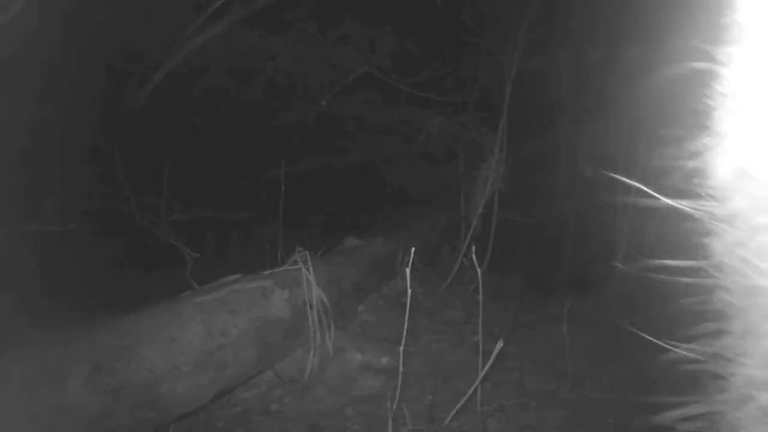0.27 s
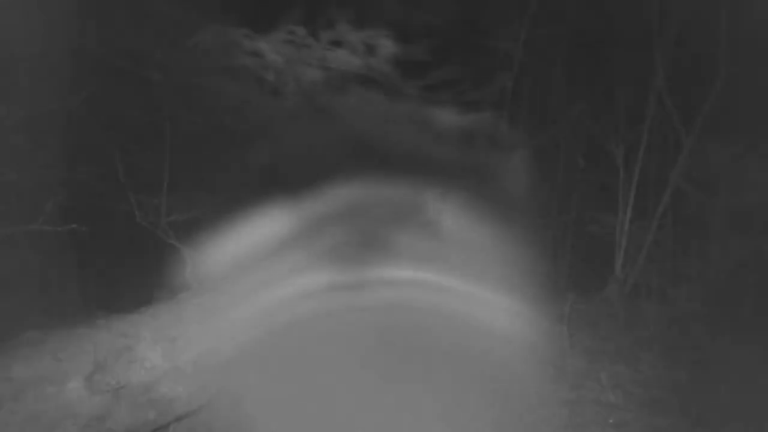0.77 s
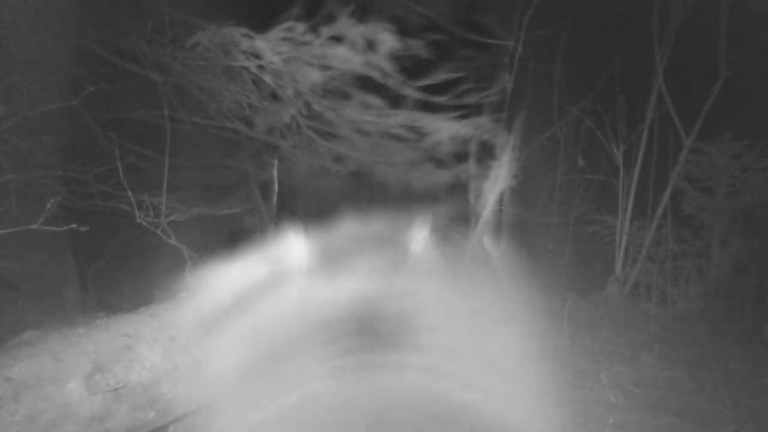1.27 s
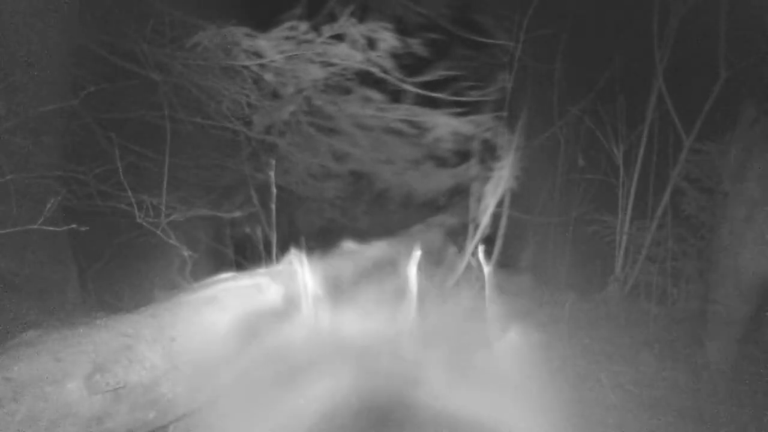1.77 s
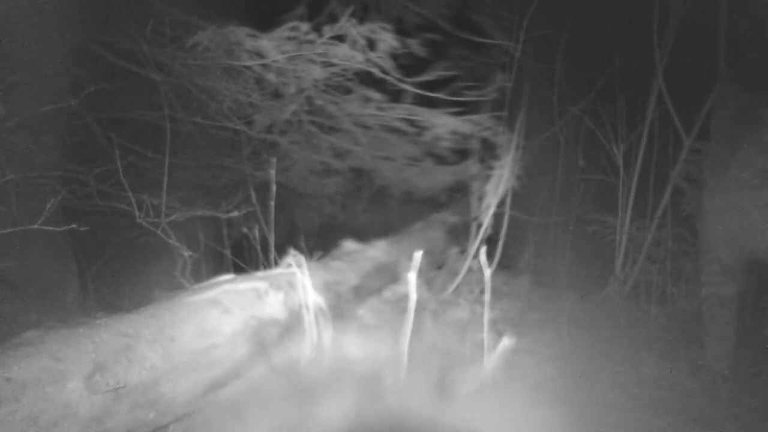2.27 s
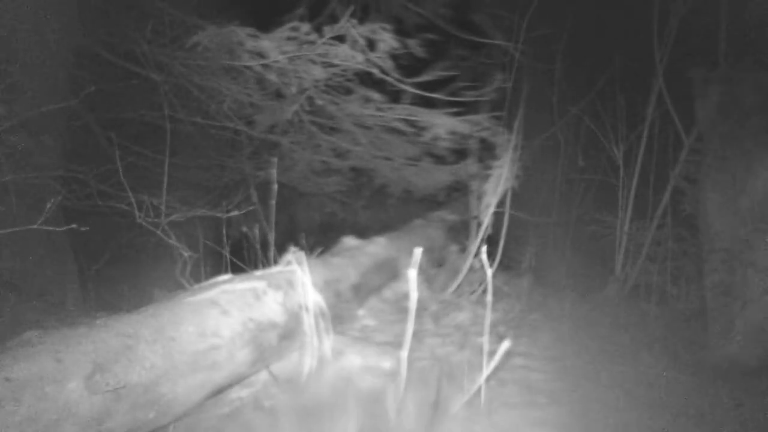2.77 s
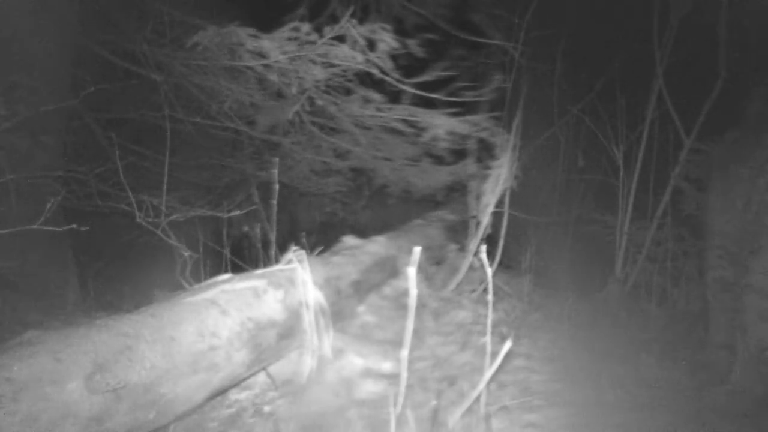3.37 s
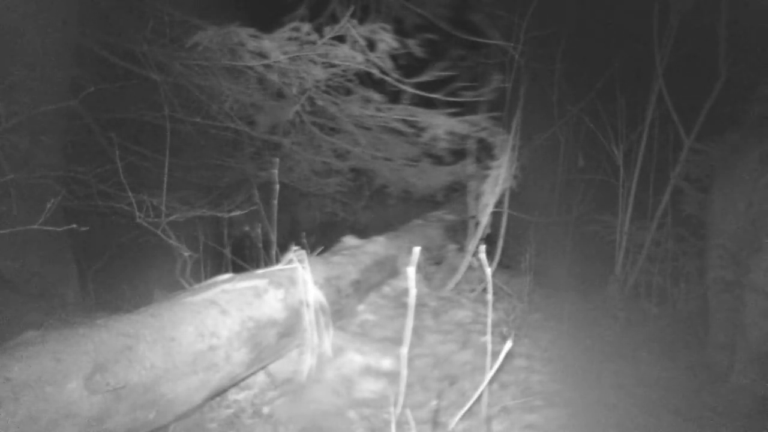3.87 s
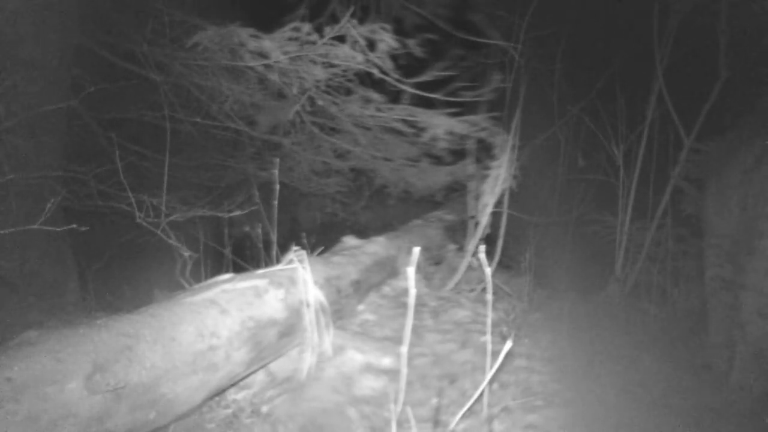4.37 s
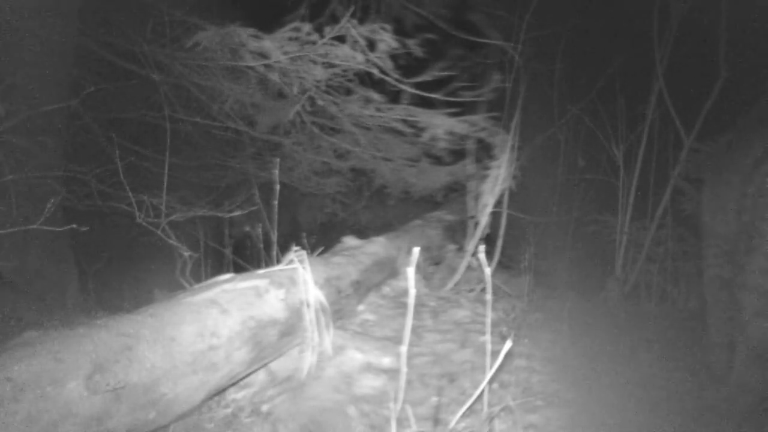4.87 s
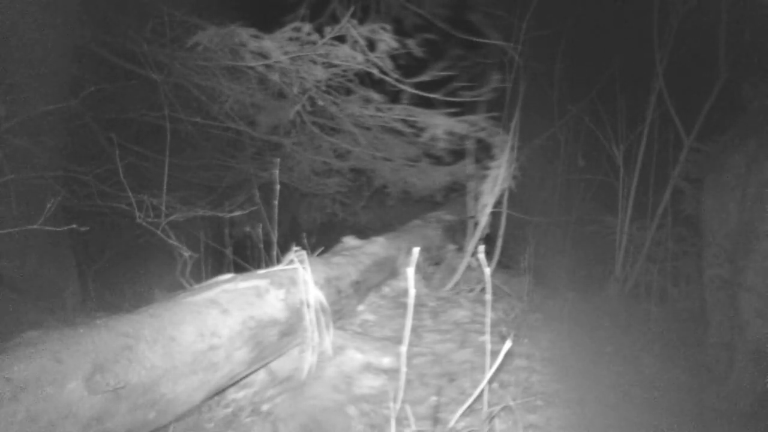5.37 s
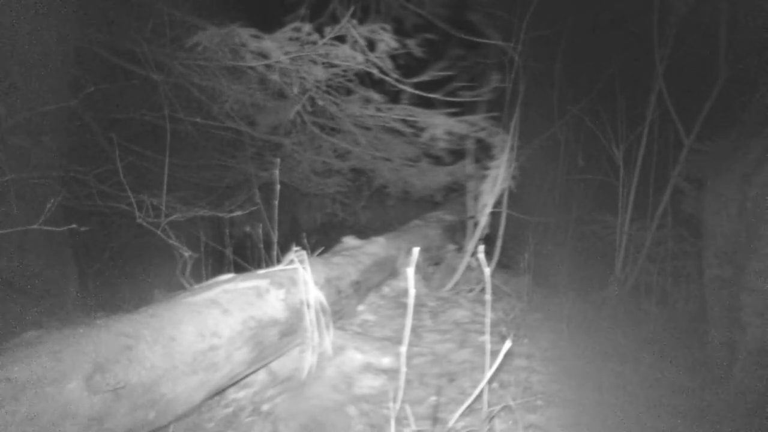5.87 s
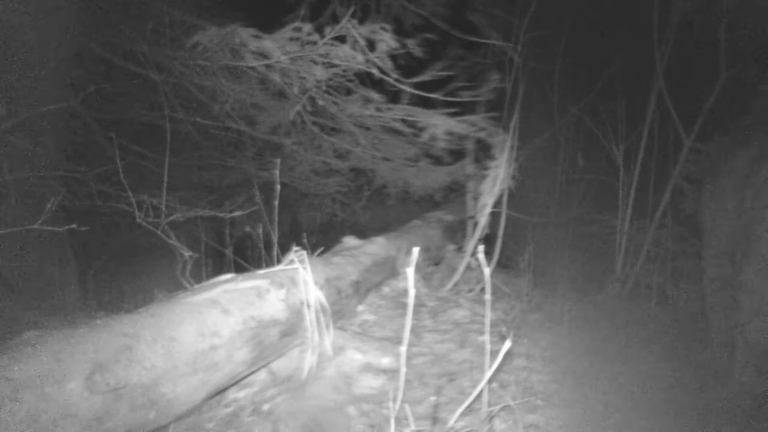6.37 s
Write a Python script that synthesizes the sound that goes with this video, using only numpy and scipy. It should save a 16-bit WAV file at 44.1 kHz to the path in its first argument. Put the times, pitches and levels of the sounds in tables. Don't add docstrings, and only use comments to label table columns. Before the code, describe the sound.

Fur scrapes and crackles against a small outdoor device at night, then a wild cat growls briefly and gives three loud, harsh, falling calls.

```python
import sys
import numpy as np
from scipy import signal
from scipy.fft import rfft, irfft, next_fast_len
from scipy.io import wavfile
from scipy.ndimage import uniform_filter1d

SR = 44100
rng = np.random.default_rng(int(sys.argv[2]) if len(sys.argv) > 2 else 0)


def master_out(mix):
    frames = np.transpose(np.atleast_2d(mix))
    ceiling = np.clip(frames, -1, 1)
    pcm = np.round(ceiling * 32767).astype(np.int16)
    wavfile.write(sys.argv[1], SR, pcm)


def decibels_to_gain(level_db):
    exponent = np.asarray(level_db, float) / 20
    return 10 ** exponent


N = 292362

# frequency in Hz, density in dB per Hz.
HISS = [(13, -32), (22, -6.5), (32, -14), (325, -17), (375, -18.5), (906, -19.5), (997, -21.5),
        (1810, -25.5), (4800, -31.5), (6550, -43), (8520, -86), (14400, -120)]
# frequency in Hz, decay time over 60 dB in seconds.
WOOD_T60 = [(300, 0.3), (800, 2), (1080, 1.96), (1300, .8), (1900, 1.4), (2400, 0.93), (4000, 0.7)]
# frequency in Hz, level in dB.
SCATTER = [(300, -13), (700, -9.5), (980, -4.5), (1075, 3), (1180, -3.5), (1400, 4), (1900, 10.5),
           (2400, 16.5)]

# frequency in Hz, width in Hz.
PORT = (4880, 1200)
# frequency in Hz, width in Hz, level in dB.
CASE = [(280, 470, -1.5), (550, 160, 8.5), (1040, 430, 11), (1625, 1500, 3.5), (2690, 1400, 11.5)]
# time in seconds, peak in dB, case level relative to it in dB.
SNAPS = [(0.0683, -30, -10.5), (0.1284, -29, -4), (0.1536, -19.5, -6), (0.4117, -33.5, -4),
         (0.4686, -34, -7.5), (0.5541, -33.5, -9), (0.7133, -39, -14), (0.7645, -27, -4), (0.8207, -35, -5),
         (0.828, -33.5, -0.5), (0.8535, -31, -10), (0.8833, -42, -5), (0.904, -40, -8), (0.9105, -33, 3),
         (1.067, -40, -11), (1.0869, -35.5, -16), (1.1963, -37, -15), (1.2197, -35, -7), (1.4698, -33, -13),
         (1.5187, -36, -8), (1.6404, -35.5, -3), (1.7486, -35, -12), (1.7755, -31, -11),
         (1.8407, -35.5, -1.5), (2.0597, -38, -8), (2.354, -38, -12), (2.385, -38.5, -10),
         (2.6894, -27.5, -18), (2.8399, -40, -13)]
# start in seconds, length in seconds, crackle in dB,
# case level relative to it in dB.
STROKES = [(0, 0.2, -46.5, 2.5), (0.129, 0.057, -43.5, 8), (.345, 0.37, -55.5, -2.5), (.4, 0.027, -55, -1),
           (0.61, 0.039, -53, -3), (0.758, 0.025, -42.5, -2), (0.815, .19, -54.5, -1),
           (0.923, 0.055, -51.5, -2), (1.042, 0.46, -57, -4), (1.219, 0.09, -47.5, -3.5),
           (1.518, 0.077, -45.5, -1.5), (1.597, 0.053, -55.5, -1), (1.739, 0.044, -52, 0),
           (1.824, 0.048, -54.5, -6), (2.049, 0.04, -52, -5), (2.099, 0.035, -53.5, -2.5),
           (2.163, 0.095, -64, 4), (2.353, 0.11, -59, 0), (2.833, 0.15, -57, 0.5), (2.95, 0.12, -55, -1.5),
           (3.064, 0.27, -69, -6), (.2, 2.5, -63, -6), (0.148, .02, -40.5, 6), (1.525, 0.044, -47.5, 3),
           (0.779, 0.0098, -35.5, 1.5), (0, 0.012, -42.5, 2)]
# time in seconds, level in dB.
NUDGES = [
    (.142, -59),
    (.354, -65),
    (0.627, -56),
    (.8, -67),
    (2.4, -54),
]

# frequency in Hz, width in Hz, level in dB.
THROAT_LOW = [(560, 360, 1), (955, 263, 4.5), (1194, 67, -18.5)]
THROAT_MID = [(1620, 110, -1), (1770, 110, -2), (1910, 90, 0), (2140, 110, -7), (2340, 90, -9)]
THROAT_EDGE = [(2600, 110, 13.5), (3140, 300, -3)]
THROAT_TOP = [(4735, 510, -0.5), (5540, 550, -1.5)]
# frequency in Hz, width in Hz, fading time in seconds.
GAPE = (1325, 160, 0.048)
# frequency in Hz, width in Hz, level in dB.
CHEST = (260, 100, -43.5)

# time in seconds, level in dB.
EFFORT = [
    [(2.465, -54.5), (2.477, -37), (2.505, -25), (2.591, -18.5), (2.69, -25), (2.76, -28.5), (2.82, -44.5),
     (2.87, -60)],
    [(3.795, -78), (3.803, -53.5), (3.847, -25), (3.905, -9.5), (3.969, -13), (4.015, -19.5), (4.075, -20),
     (4.19, -56)],
    [(5.03, -65), (5.042, -58), (5.056, -36), (5.102, -14), (5.138, -7.5), (5.234, -12.5), (5.366, -22),
     (5.416, -39.5), (5.45, -58.5)],
    [(6.255, -71), (6.277, -43.5), (6.307, -19), (6.377, -8.5), (6.447, -7.5), (6.487, -12.5),
     (6.609, -19.5), (6.63, -18.5)],
]
# time in seconds, frequency in Hz.
WHISTLE = [
    [(2.465, 4820), (2.68, 4600), (2.76, 3920), (2.87, 3900)],
    [(3.795, 4880), (3.9, 4900), (4.1, 5300), (4.19, 4780)],
    [(5.03, 4840), (5.31, 4985), (5.36, 4390), (5.42, 4470), (5.45, 4240)],
    [(6.255, 4880), (6.5, 4920), (6.59, 4890), (6.63, 4600)],
]
# time in seconds, frequency in Hz.
LOW = [
    [(2.465, 100.2), (2.531, 156.1), (2.599, 171.5), (2.709, 142.4), (2.765, 167.8), (2.813, 135),
     (2.87, 129.6)],
    [(3.795, 202.2), (3.811, 217.6), (3.867, 483), (3.913, 523.1), (4.0, 501.7), (4.031, 474),
     (4.091, 472.5), (4.141, 374.4), (4.19, 380)],
    [(5.03, 346.2), (5.118, 581.2), (5.174, 672.7), (5.22, 693), (5.294, 554), (5.335, 520), (5.378, 489),
     (5.415, 396), (5.45, 384)],
    [(6.255, 384), (6.305, 506), (6.349, 732.3), (6.385, 746), (6.467, 709.2), (6.549, 585.3),
     (6.597, 518.5), (6.63, 532)],
]
# time in seconds, frequency in Hz.
HIGH = [
    [(2.48, 432.8), (2.574, 539), (2.645, 466.2), (2.719, 434), (2.751, 498), (2.8, 417)],
    [(3.82, 424), (3.88, 785.5), (3.914, 886.5), (3.96, 836), (3.995, 727), (4.091, 702), (4.14, 556)],
    [(5.05, 493.8), (5.108, 914), (5.112, 1109), (5.202, 1056), (5.288, 870), (5.342, 774), (5.43, 782)],
    [(6.275, 596.8), (6.33, 941), (6.334, 1121), (6.35, 1156), (6.422, 1120), (6.546, 945), (6.566, 829),
     (6.63, 811)],
]
# start in seconds, end in seconds, roughness before,
# during and after it (0 to 1).
CHAOS = [
    (2.53, 2.66, .3, .5, .38),
    (3.89, 4.025, .3, .55, .12),
    (5.175, 5.295, .18, .75, .2),
    (6.42, 6.555, .2, .6, .27),
]
STAGES = (0, .25, .45, 1)
# one call, share in dB at each of the four stages.
LOW_SHARE_DB = [(-26.5, -15, -23.5, -24), (2, -21.5, -10.5, 2), (-11, -22.5, -7.5, -0.5),
                (-24.5, -16.5, -4.5, -4)]
HIGH_SHARE_DB = [(-2.5, -8.5, -10.5, -6), (-5, -9.5, -7.5, -14.5), (-4, -1, -3.5, -16.5),
                 (-0.5, -2.5, -5.5, -5)]
OCTAVE_SHARE_DB = [(-1, -16.5, -16, -4), (-15.5, -2.5, -7.5, -3), (-14.5, -9, -7.5, -2),
                   (-8.5, -16, -12, -15)]
# upper throat in dB, edge in dB, top in dB,
# whistle over the top in dB.
COLOUR_DB = [(-14.5, -33.5, -42.5, -14), (-15.5, -34.5, -43, -12.5), (-15, -21.5, -42, -11.5),
             (-14.5, -11.5, -40, -13.5)]
# pitch jitter as a share, opening mouth in dB, depth of the beat at half
# the tone spacing, sum tone in dB, share of regular slaps in the rasp.
MANNER = [(0.027, -7.5, 0.21, -48, 0.56), (0.0089, 3.5, 0.13, -18, 0.22), (0.0054, -3.5, 0.37, -30, 0.26),
          (0.0099, -6, 0.3, -18, 0.27)]


def evened(x):
    return x / np.sqrt(np.mean(x ** 2) + 1e-20)


def read(points, hz):
    f, value = np.transpose(points)
    return np.interp(np.log(hz + 1), np.log(f + 1), value)


def along(rows, t):
    s, value = np.transpose(rows)
    return np.interp(t, s, value)


def ring(x, modes):
    out = 0
    for k, (hz, width, db) in enumerate(modes):
        b, a = signal.iirpeak(hz, hz / (1.58 * width), SR)
        once = signal.lfilter(b, a, x)
        out = out + (-1) ** k * decibels_to_gain(db) * signal.lfilter(b, a, once)
    return out


def drift(count, hz):
    lowpass = signal.butter(2, hz, fs=SR, output="sos")
    return evened(signal.sosfilt(lowpass, rng.standard_normal(count + 4000))[4000:])


def above(x, edge_hz):
    hz, t, z = signal.stft(x, SR, nperseg=1024, noverlap=896)
    edge = np.interp(t * SR, np.arange(len(x)), edge_hz)
    kept = z / (1 + (edge / (hz[:, None] + 1)) ** 10)
    return signal.istft(kept, SR, nperseg=1024, noverlap=896)[1][:len(x)]


def glide(x, hz, width):
    turn = np.exp(2j * np.pi * np.cumsum(hz) / SR)
    r = np.exp(-np.pi * width / SR)
    once = signal.lfilter([1 - r], [1, -r], x / turn)
    return (turn * signal.lfilter([1 - r], [1, -r], once)).real


def night():
    hz = np.fft.rfftfreq(N, 1 / SR)
    shaped = irfft(rfft(rng.standard_normal(N)) * decibels_to_gain(read(HISS, hz)), N)
    return decibels_to_gain(-57.5) * evened(shaped)


def wood(x):
    hz, t, z = signal.stft(rng.standard_normal(2 * SR), SR, nperseg=1024)
    far_db = -36.5 + read(SCATTER, hz)[:, None] - 60 * t / read(WOOD_T60, hz)[:, None]
    far = decibels_to_gain(far_db) * np.clip(t / 0.088, 0, 1)
    near = decibels_to_gain(-16 - 60 * t / 0.36)
    tail = signal.istft(z * (far + near), SR, nperseg=1024)[1]
    return signal.fftconvolve(x, tail / 30)[:N]


def nudges(t):
    rise_s, fall_s = 0.056, 0.03
    band = signal.butter(2, [25, 130], "band", fs=SR, output="sos")
    thud = evened(signal.sosfilt(band, rng.standard_normal(N)))
    return thud * sum(decibels_to_gain(db) * np.exp(np.minimum((t - s) / rise_s, (s - t) / fall_s)) for s, db in NUDGES)


def snaps(bright):
    out = np.zeros(N)
    tick = np.zeros(600)
    tick[0] = 1
    for s, peak_db, rel_db in SNAPS:
        burst = tick + 0.15 * rng.standard_normal(600) * np.exp(-np.arange(600) / 60)
        top, body = ring(burst, bright), ring(burst, CASE)
        snap = top / abs(top).max() + decibels_to_gain(rel_db - 2.0) * body / abs(body).max()
        out[round(s * SR):][:600] += decibels_to_gain(peak_db + 2.0) * snap
    return out


def strokes(t):
    touch_s, lift_s, swell = 0.005, 0.0077, 3
    start, length, db, body_db = np.transpose(STROKES)[:, :, None]
    arch = np.sin(np.pi * np.clip((t - start) / length, 0, 1)) - .5
    power = decibels_to_gain(2 * (db + swell * arch * (start > 0)))
    power = power * np.clip((t - start) / touch_s + (start <= 0), 0, 1)
    power = power * np.exp(-np.maximum(t - start - length, 0) / (lift_s / 2))
    return np.sqrt(power.sum(0)), np.sqrt((power * decibels_to_gain(2 * body_db)).sum(0))


def fur():
    t = np.arange(N) / SR
    crackle, contact = strokes(t)
    size = decibels_to_gain(3.5 * np.minimum(rng.exponential(1, N), 5))
    struck = rng.random(N) < 2500 / SR
    slips = size * struck * rng.choice([-1, 1], N)
    clumps = decibels_to_gain(2.44 * drift(N, 58) + 0.85 * drift(N, 14.7))
    slips = (evened(slips) + 0.45 * rng.standard_normal(N)) * clumps
    bright = [(*PORT, 0), (3700, 1200, -7)]
    port, case = ring(slips, bright), ring(slips, CASE)
    out = crackle * port / port[:3 * SR].std()
    out += decibels_to_gain(-4.5) * contact * case / case[:3 * SR].std()
    return out + snaps(bright) + nudges(t)


def roughness(t, stage, spell):
    start, end, before, during, after = spell
    rough = np.interp(t, [start - .02, start + .01, end - .01, end + .015], [before, during, during, after])
    return rough + .3 * np.clip(4 * (1 - stage / .22), 0, 1)


def fold_tones(low_phase, high_phase, levels, sum_level, rough, stage, halves):
    def waver(depth):
        chance = drift(len(stage), 75) + 1j * drift(len(stage), 75)
        return np.sqrt(1 - depth ** 2) + depth * chance / np.sqrt(2)

    low_level, octave_level, high_level = levels
    tones = low_level * waver(.55 * rough) * np.exp(1j * low_phase)
    tones = tones + octave_level * waver(rough) * np.exp(2j * low_phase)
    tones = tones + high_level * waver(rough) * np.exp(1j * high_phase)
    mixed = np.cos(low_phase + high_phase) + 0.16 * np.cos(2 * high_phase)
    mixed = mixed + (.1 + 1.4 * stage * (1 - rough) ** 2) * np.cos(3 * low_phase)
    return np.sqrt(2) * halves * (tones + sum_level * waver(rough) * mixed).real


def fold_noise(low_phase, high_phase, hz, chaos, halves, regular):
    slaps = sum(np.cos(k * low_phase + .35 * k ** 2) * (k * hz < 6500) for k in range(1, 45))
    slaps = slaps * (1 + 1.4 * np.cos(high_phase - low_phase)) * halves
    cycle = low_phase / (2 * np.pi) % 1
    puffs = (1.2 + np.exp(-cycle / 0.84)) * rng.standard_normal(len(hz))
    drive = regular * evened(slaps) + (1.5 - regular) * chaos * evened(puffs)
    return above(drive, 0.95 * hz), puffs


def throat(drive, puffs, t, stage, effort_db, mid_db, chaos, colour_db, gape_db, whistle):
    _, edge_db, top_db, whistle_db = colour_db
    edge_db = edge_db - 27.5 * stage
    top_db = top_db - (1 - 0.6) * effort_db
    rasp = chaos * decibels_to_gain(-2.5) * evened(ring(drive, THROAT_LOW))
    breathy = drive + 0.86 * evened(puffs)
    rasp += decibels_to_gain(mid_db - 4.0) * evened(ring(breathy, THROAT_MID))
    rasp += decibels_to_gain(edge_db - 6.0) * evened(ring(drive, THROAT_EDGE))
    rasp += decibels_to_gain(gape_db) * np.exp(-(t - t[0]) / GAPE[2]) * evened(ring(drive, [(*GAPE[:2], 0)]))
    rasp += decibels_to_gain(top_db - 3 * stage ** 2) * evened(ring(drive, THROAT_TOP))
    whistle_level = decibels_to_gain(top_db + whistle_db + 15 * stage)
    return rasp + whistle_level * evened(glide(drive, along(whistle, t), 130))


def call(effort, whistle, spell, low, high, low_share, high_share, octave_share, colour_db,
         jitter, gape_db, beat, sum_db, regular):
    t = np.arange(effort[0][0], effort[-1][0], 1 / SR)
    stage = (t - t[0]) / (t[-1] - t[0])
    effort_db, hz, high_hz = (along(curve, t) for curve in (effort, low, high))
    low_db, high_db, octave_db = (effort_db + np.interp(stage, STAGES, share)
                                  for share in (low_share, high_share, octave_share))
    octave_db = octave_db - 9.5 * np.maximum(2 * hz - 1030, 0) / 100
    mid_db = colour_db[0] + 5 * stage + 0.13 * (effort_db - effort_db.max())
    rough = roughness(t, stage, spell)

    sounding = np.minimum(t - high[0][0], high[-1][0] + 0.0047 - t)
    high_level = decibels_to_gain(high_db) * np.clip(sounding / 0.0038, 0, 1)
    used = (decibels_to_gain(2 * low_db) + decibels_to_gain(2 * octave_db) + high_level ** 2) / decibels_to_gain(2 * effort_db)
    chaos = np.sqrt(np.clip(1 - 1.155 * used, .03, 1))

    low_phase, high_phase = (2 * np.pi * np.cumsum(f * (1 + 2.5 * jitter * rough * drift(len(t), 120))) / SR
                             for f in (hz, high_hz))
    halves = 1 + beat * chaos * np.cos((high_phase - low_phase) / 2)
    levels = decibels_to_gain(low_db), decibels_to_gain(octave_db), high_level
    sum_level = decibels_to_gain(effort_db + mid_db + sum_db + 8.5)
    tones = fold_tones(low_phase, high_phase, levels, sum_level, rough, stage, halves)
    drive, puffs = fold_noise(low_phase, high_phase, hz, chaos, halves, regular)
    rasp = throat(drive, puffs, t, stage, effort_db, mid_db, chaos, colour_db, gape_db, whistle)
    chest = decibels_to_gain(effort_db) * decibels_to_gain(CHEST[2]) * evened(ring(puffs, [(*CHEST[:2], 0)]))
    voice = above(tones + decibels_to_gain(effort_db) * rasp, np.maximum(.6 * hz, 125)) + chest
    return round(t[0] * SR), voice * np.clip((t - t[0]) / .008, 0, 1)


def cat():
    out = np.zeros(N + SR)
    for *controls, manner in zip(EFFORT, WHISTLE, CHAOS, LOW, HIGH, LOW_SHARE_DB, HIGH_SHARE_DB,
                                 OCTAVE_SHARE_DB, COLOUR_DB, MANNER):
        at, sound = call(*controls, *manner)
        out[at:at + len(sound)] += sound
    return out[:N]


def scene():
    voice = cat()
    return (night() + fur() + wood(voice) + voice)[None]


def top_cut(x):
    return signal.sosfilt(signal.butter(12, 15850, fs=SR, output="sos"), x)


def record(dry):
    knee, ceiling, offset = .79, .705, .0071
    lowpass = signal.cheby2(12, 95, 7646, fs=SR, output="sos")
    narrow = signal.sosfilt(lowpass, dry)
    envelope = abs(signal.hilbert(narrow, next_fast_len(N))[:, :N])
    swing = uniform_filter1d(envelope, size=50)
    limited = narrow / (1 + (swing / knee) ** 6) ** (1 / 6)
    clipped = np.clip(limited + offset, -ceiling, ceiling)
    return top_cut(clipped + decibels_to_gain(-98.0) * rng.standard_normal(N))


dry = scene()
out = record(dry)
master_out(out)
```